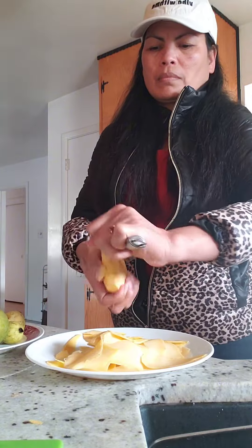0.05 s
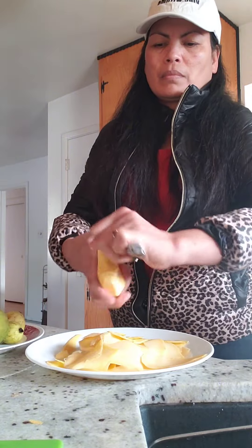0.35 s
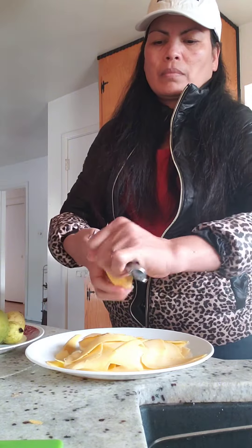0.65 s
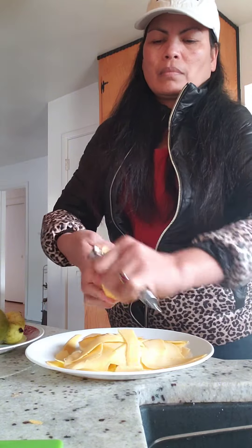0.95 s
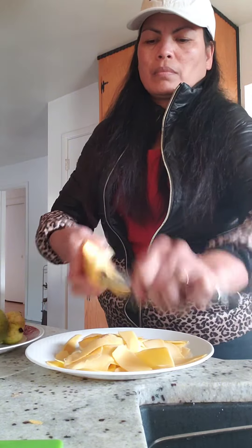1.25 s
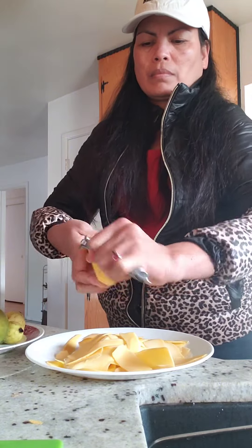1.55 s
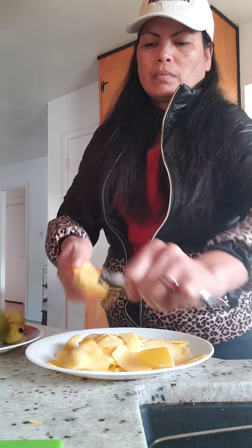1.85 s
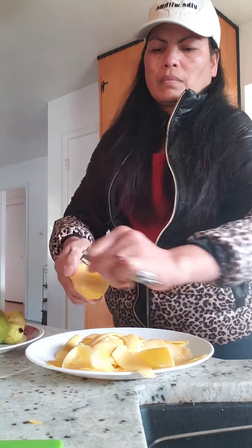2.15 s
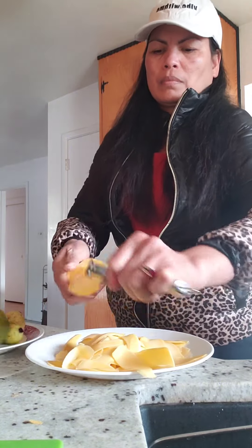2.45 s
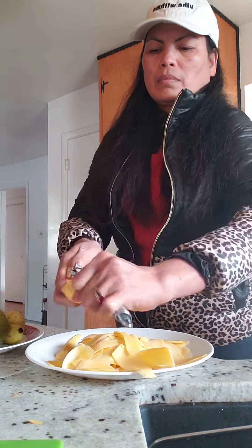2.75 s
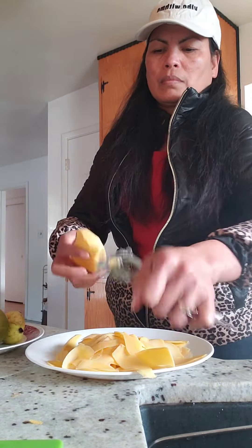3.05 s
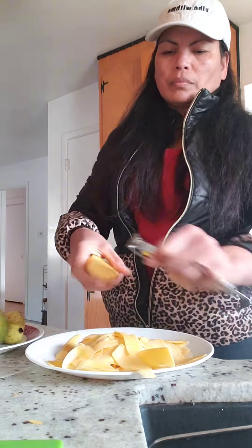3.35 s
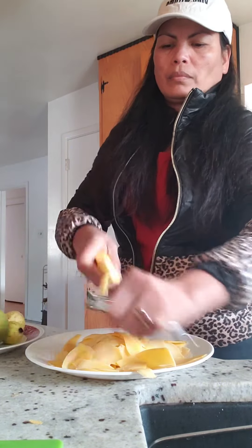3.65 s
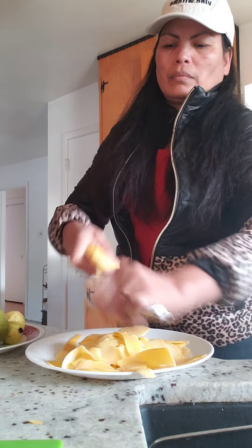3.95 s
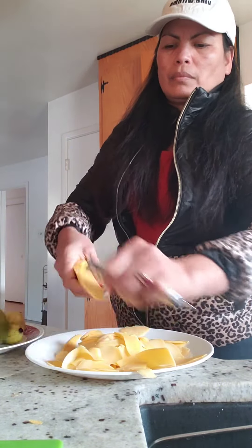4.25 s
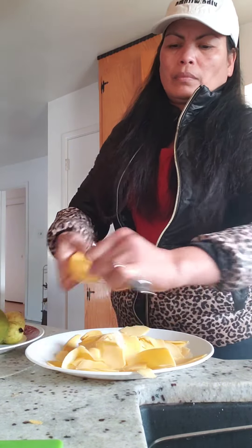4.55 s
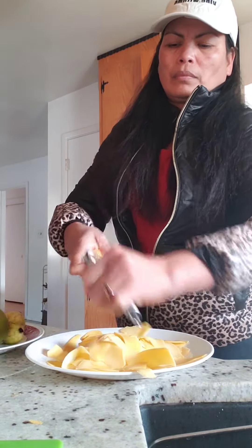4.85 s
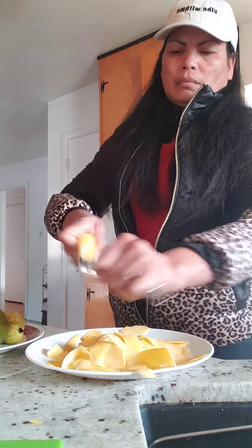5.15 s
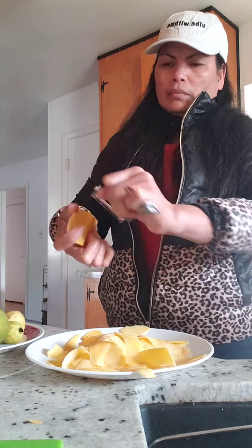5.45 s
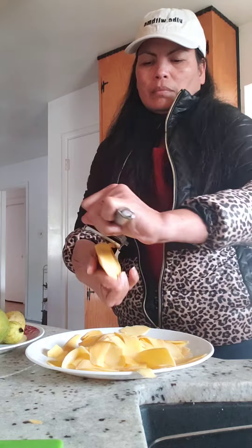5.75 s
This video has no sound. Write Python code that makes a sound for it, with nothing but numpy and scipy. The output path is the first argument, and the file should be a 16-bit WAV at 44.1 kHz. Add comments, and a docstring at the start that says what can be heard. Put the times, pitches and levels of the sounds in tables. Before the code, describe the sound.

A swivel peeler strips a ripe mango close to the microphone in a quiet kitchen with very little echo. From the start, short, bright scrapes come several times a second at an uneven pace. The blade skids on the skin, tears wetly through the flesh and clicks sharply against its stops, sometimes with a tiny metallic ping. A piece of peel pats down softly at about 0.9 seconds. The strokes carry on until about 2.8 seconds, then grow lighter and sparser, with a few clicks and a faint rustle of hands shifting grip. From 3.4 to 4.9 seconds comes a fast, steadier run, with one dull knock at 4.8 seconds. Another soft pat and some rustling follow just after 5 seconds, then scattered scrapes and clicks until about 5.8 seconds. A low room drone and a faint hiss continue underneath throughout.

```python
"""A swivel peeler strips a ripe mango over a stone counter in a quiet kitchen.
The blade skids on the skin in short, bright scrapes that set the peeler ringing, tears wetly through
the flesh and clicks against its pivot stops. Peel pats down; one stroke lands with a dull knock.
Below lie a low room drone, a faint hiss and the rustle of hands."""
import sys
import numpy as np
from scipy import signal
from scipy.fft import rfft, irfft
from scipy.io import wavfile

SR = 44100
rng = np.random.default_rng(int(sys.argv[2]) if len(sys.argv) > 2 else 0)


def store_pcm(level_fs):
    """Save levels as 16-bit WAV."""
    pcm = np.round(np.clip(level_fs, -1, 1) * 32767).astype(np.int16)
    wavfile.write(sys.argv[1], SR, np.atleast_2d(pcm).T)


N = 256220
TIME_S = np.arange(N) / SR
FREQS_HZ = np.maximum(np.arange(N // 2 + 1) * SR / N, 1)

# drone contour: (time [s], level before gain [dB])
DRONE_CONTOUR = [(0, -64), (2.9, -64.5), (3.15, -61.5), (3.5, -62), (4.65, -61), (4.78, -55.5), (5.02, -61),
                 (5.81, -55)]
# background noise: (frequency [Hz], relative density [dB])
DRONE_SPECTRUM = [(20, -30), (45, -16.5), (100, -5.5), (121, 3.5), (160, -7), (235, -21), (305, -13.5),
                  (450, -34.5), (1000, -40.5)]
HISS_SPECTRUM = [(300, 3), (1700, -1), (2600, 0), (3800, -3), (6400, 1.5), (8600, -15), (13000, 7),
                 (15700, 5)]
# peeling strokes: (start [s], length [s], catch skid [dB], leave skid [dB], slide [dB],
# tear [dB], deep bite [dB])
STROKES = [(0.04, 0.057, -28, -34.5, -39, -52.5, -61), (0.27, 0.025, -42, -16, -35, -44, -62),
           (0.43, 0.018, -35, -32, -38.0, -45, -62.5), (0.535, 0.016, -16.5, -33, -27.5, -53, -71),
           (0.604, 0.0098, -13.5, -20.5, -25.5, -47, -73), (0.659, 0.013, -23, -29, -30.5, -56.0, -54),
           (0.709, 0.039, -54, -15, -28.5, -40.5, -52.5), (0.852, 0.052, -56, -15.0, -31, -40, -53),
           (0.978, 0.015, -14.5, -41.5, -48.0, -37.5, -46.5), (0.998, 0.035, -54, -16.5, -36, -38.5, -62),
           (1.104, 0.051, -18, -16, -32.0, -36, -48.5), (1.227, 0.051, -12.5, -12, -27, -33.5, -43.0),
           (1.348, 0.015, -11, -22, -25.5, -31, -40.5), (1.607, 0.025, -33.5, -19, -34, -34.5, -71),
           (1.82, 0.044, -38, -17.5, -36.5, -34.5, -49.5), (1.943, 0.048, -22.5, -16, -27.5, -32, -43.5),
           (2.042, 0.036, -24, -41, -42, -36.5, -46.5), (2.099, 0.023, -33, -19.5, -28.5, -33, -46),
           (2.211, 0.032, -23, -15.5, -29.5, -35.5, -49.5), (2.373, 0.052, -22, -17.0, -33, -34, -51),
           (2.55, 0.036, -20.5, -18.5, -38, -36, -68.5), (2.65, 0.037, -13.5, -19.0, -30.5, -35.5, -55),
           (2.74, 0.028, -22, -41, -31, -33.5, -42.5), (2.991, 0.0059, -30.5, -38, -45, -33, -44.5),
           (3.094, 0.02, -25, -24.5, -36.5, -67, -73), (3.134, 0.017, -28, -29.5, -36.5, -64, -71),
           (3.443, 0.0071, -23, -19, -35, -47.0, -48), (3.471, 0.023, -43, -12, -27, -36, -44.5),
           (3.571, 0.029, -21, -11.5, -28.5, -37.5, -42), (3.663, 0.03, -15, -15.0, -32, -40, -44),
           (3.758, 0.034, -18, -16, -31, -39.5, -42.5), (3.858, 0.035, -15.5, -11.5, -31.5, -38.0, -39),
           (3.97, 0.027, -18.5, -12, -27, -35, -42.5), (4.223, 0.027, -35, -12, -28.5, -35.5, -49.5),
           (4.319, 0.042, -24, -14, -33.5, -34.5, -41), (4.433, 0.032, -18, -14.5, -32, -37.5, -58),
           (4.521, 0.031, -21.5, -11.5, -32, -42.5, -60.5), (4.605, 0.03, -17.5, -14.5, -30.0, -39.5, -52),
           (4.673, 0.028, -17, -16, -32, -40, -45.5), (4.736, 0.034, -21, -18.5, -26, -32.5, -40.5),
           (4.8, 0.033, -32, -28, -23, -30, -36), (4.878, 0.032, -15, -23, -29, -35, -43),
           (5.185, 0.012, -24.5, -19.5, -28.5, -45, -52), (5.282, 0.01, -21.5, -20, -29.5, -62, -62),
           (5.704, 0.034, -40, -19, -33, -34, -74)]
# blade glances off the skin: (peak time [s], level [dB])
FLICKS = [(0.338, -28), (0.396, -26.5), (0.833, -14), (1.56, -33), (1.785, -24.5), (2.165, -26),
          (2.783, -37), (3.028, -26), (3.184, -34.5), (3.522, -17.5), (3.923, -27.5), (3.947, -23.5),
          (4.092, -28.5), (4.156, -36), (4.187, -28), (4.947, -37.5), (5.055, -30), (5.532, -21),
          (5.578, -35.0), (5.639, -23.5)]
# blade hits its pivot stop: (time [s], level [dB])
PIVOT_CLICKS = [(0.293, -9.5), (0.398, -25), (0.4452, -17), (0.5303, -12.5), (0.668, -12.5), (0.7921, -14),
                (0.831, -29), (0.9881, -9.5), (1.035, -14.5), (1.16, -13), (1.3416, -12.5), (1.8617, -10.5),
                (1.986, -13.5), (2.053, -17), (2.0645, -9.5), (2.216, -20), (2.5554, -19), (2.5913, -19),
                (2.7605, -17), (3.0061, -16), (3.1156, -11), (3.1537, -16.0), (3.5763, -10), (3.6721, -10),
                (3.6943, -14.5), (3.7684, -12), (3.998, -25), (4.2434, -10), (4.2538, -15.5),
                (4.3322, -10.5), (4.6484, -20), (4.7168, -15), (4.806, -11), (4.841, -7), (4.9197, -23.5),
                (5.276, -26), (5.767, -25), (5.78, -22)]
# blade and frame resonances: (frequency [Hz], width [Hz], level over friction noise [dB])
PEELER_MODES = [(2416, 114, 7.5), (2580, 34, 6), (2930, 38, 4), (4160, 400, 6), (6167, 147, 7.5),
                (6756, 215, 4.5), (11070, 225, 7.5), (12790, 500, 3), (16280, 870, 10.5)]
# friction noise: (frequency [Hz], relative density [dB])
RASP_SPECTRUM = [(4500, -43), (7500, -11.5), (9200, -16), (10400, -11), (11800, -3.5), (12800, 0),
                 (14300, -1.5), (15700, -2.5)]
RING_SPECTRUM = [(1000, -18.5), (1800, -10), (2300, 0.5), (3400, -2.5), (4700, -0.5), (5400, 4.5),
                 (6700, 0), (7400, -12), (9500, -4.5)]
# deep tear, shallow shave, shaken fruit: (frequency [Hz], relative density [dB])
TEAR_SPECTRUM = [(450, -19), (800, -15.5), (970, 1.5), (1250, 2), (1800, 0.5), (2600, 0.5), (5000, -13)]
SHAVE_SPECTRUM = [(500, -18), (950, -15), (1300, 4.5), (1720, 7), (2100, 6), (2600, 6), (5000, -10.5)]
BITE_SPECTRUM = [(150, -3), (300, -3), (385, -10), (480, 2.5), (650, -0.5), (800, -7.5), (1300, -23)]
# peel lands: (time [s], pat [dB], thud [dB])
PEEL_PATS = [(0.94, -40, -41), (5.149, -42, -68)]
# blade chatter, pitch set by where it is held: (peak time [s], frequency [Hz], level [dB])
CHATTERS = [(0.17, 2720, -54), (0.298, 2664, -25), (0.534, 2526, -24.5), (.535, 6220, -24.5),
            (.605, 2655, -22), (.746, 2540, -29), (0.835, 2784, -29), (1.159, 2420, -26),
            (2.993, 1700, -36.5), (3.12, 2960, -26.5), (3.157, 2950, -29), (3.602, 2376, -22.5),
            (4.633, 2400, -25), (4.852, 6300, -27.5), (5.294, 2620, -28), (5.738, 1850, -28.5)]
# hands shift grip: (time [s], level [dB])
RUSTLES = [(.19, -51), (2.29, -56), (2.95, -59), (3.22, -51.5), (3.37, -54.5), (5.11, -48), (5.24, -50)]
# knock on the fruit: (time [s], level [dB])
KNOCKS = [(4.806, -27.5)]
# its modes: (frequency [Hz], gain [dB], t60 [s])
KNOCK_MODES = [(530, 10.5, 0.031), (1040, -3.5, 0.08)]
# left-right likeness of noise: (frequency [Hz], correlation [1])
STEREO_CORRELATION = [(100, 0.94), (450, 0.19), (1000, 0.24), (2000, 0.037)]
# channel colour: (frequency [Hz], left over right before normalising [dB])
STEREO_BALANCE = [(120, 12.5), (750, 4), (2500, 2), (3600, -0.5), (5400, 0), (6300, 7.5), (8200, 8),
                  (10800, 2), (12800, -7.5), (15800, 1.5)]


def from_db(db):
    return 10 ** (np.asarray(db) / 20)


def unit_rms(x):
    return x / np.sqrt(np.mean(x ** 2) + 1e-20)


def at_freqs(points):
    """Table interpolated over log frequency."""
    hz, value = np.transpose(points)
    return np.interp(np.log(FREQS_HZ), np.log(hz), value)


def drift(rate_hz):
    """Smooth random curve, unit RMS."""
    knots = rng.standard_normal(N // 8)
    return unit_rms(np.interp(TIME_S * rate_hz, np.arange(len(knots)), knots))


def response(spectrum, modes=()):
    """Unit-power causal filter: broad spectrum with resonances on top."""
    power = from_db(at_freqs(spectrum)) ** 2
    power /= 1 + (spectrum[0][0] / 2 / FREQS_HZ) ** 4   # low cut
    power *= 1 + sum(from_db(db) ** 2 / (1 + (2 * (FREQS_HZ - hz) / width_hz) ** 2)
                     for hz, width_hz, db in modes)
    cepstrum = irfft(np.log(power / power.mean()), N)
    cepstrum[0] /= 2
    cepstrum[N // 2:] = 0   # minimum phase: no pre-ringing
    return np.exp(rfft(cepstrum))


def filtered(x, gain):
    return irfft(rfft(x) * gain, N)


def resonate(x, hz, width_hz):
    """Two-pole resonance, unit peak gain."""
    radius = np.exp(-np.pi * width_hz / SR)
    feedforward = np.array([1, 0, -1]) * (1 - radius ** 2) / 2
    feedback = [1, -2 * radius * np.cos(2 * np.pi * hz / SR), radius ** 2]
    return signal.lfilter(feedforward, feedback, x + 1e-18)


def stereo_noise():
    """White noise: alike in the bass, unrelated in the treble."""
    mid, side = rfft(rng.standard_normal((2, N)))
    alike = np.clip(at_freqs(STEREO_CORRELATION), -1, 1)
    return unit_rms(irfft(np.sqrt(1 + alike) * mid + np.sqrt(1 - alike) * side * [[1], [-1]], N))


def pulse(peak_s, half_s):
    """Envelope with flanks linear in dB."""
    return 1 / np.cosh(np.clip((TIME_S - peak_s) / half_s, -20, 20))


def swell(peak_s, half_s):
    """Gaussian envelope."""
    return np.exp(-.5 * np.minimum(((TIME_S - peak_s) / half_s) ** 2, 20))


def decay(start_s, t60_s):
    """Envelope of a blow."""
    return (TIME_S >= start_s) * from_db(-60 * np.clip((TIME_S - start_s) / t60_s, 0, 2))


def room_drone(gain_db=3.5, waver_db=2.3):
    """Low noise, wavering in level."""
    level_db = gain_db + np.interp(TIME_S, *np.transpose(DRONE_CONTOUR)) + waver_db * drift(rate_hz=12)
    return from_db(level_db) * filtered(stereo_noise(), response(DRONE_SPECTRUM))


def hiss(rustle, floor_db=-57):
    """Thin steady noise, lifted by the rustle envelope."""
    return filtered(np.hypot(from_db(floor_db), rustle) * stereo_noise(), response(HISS_SPECTRUM))


def friction(attack_db_per_s=1500, release_db_per_s=779, skid_ring_db=-10, slide_rasp_db=-1.3):
    """Rasp and ring power. Stroke: skid on, slide under the skin, skid off. Flick: one skid."""
    slide_power = np.zeros(N)
    skids = list(FLICKS)
    for start_s, length_s, catch_db, leave_db, slide_db, _, _ in STROKES:
        near = slice(*np.searchsorted(TIME_S, [start_s - .1, start_s + length_s + .1]))
        age_s = TIME_S[near] - start_s
        fade_db = attack_db_per_s * np.maximum(-age_s, 0)
        fade_db += release_db_per_s * np.maximum(age_s - length_s, 0)
        tilt_db = 0.37 * (leave_db - catch_db)   # slide partly follows its two skids
        force_db = tilt_db * (np.clip(age_s / length_s, 0, 1) - .5)
        slide_power[near] += from_db(slide_db + force_db - fade_db) ** 2
        skids += [(start_s, catch_db), (start_s + length_s, leave_db)]
    skid_power = sum((from_db(db) * pulse(peak_s, half_s=0.0062)) ** 2 for peak_s, db in skids)
    rasp_power = skid_power + slide_power * from_db(slide_rasp_db) ** 2
    ring_power = slide_power + skid_power * from_db(skid_ring_db) ** 2
    return rasp_power, ring_power


def stick_slip(rate_hz, rough_db):
    """Force jumps as a contact catches and frees itself; unit RMS."""
    return unit_rms(from_db(rough_db * np.clip(drift(rate_hz), -2, 2)))


def fibre_crackle(snaps_per_s=150, burst_db=0.5, t60_s=0.0056):
    """Fibres snap at random, each a tiny burst on the friction; unit RMS."""
    snaps = (rng.random(N) < snaps_per_s / SR) * np.minimum(rng.exponential(1, N), 2.5)
    bursts = signal.lfilter([1], [1, -from_db(-60 / (t60_s * SR))], snaps + 1e-18)
    return unit_rms(np.hypot(1, from_db(burst_db) * bursts))


def peeler(clicks, click_ring_db=-10.5):
    """Friction and pivot clicks drive the same blade and frame."""
    rasp_power, ring_power = friction()
    grip = stick_slip(rate_hz=800, rough_db=1.47) * fibre_crackle()
    rasp = np.hypot(grip * np.sqrt(rasp_power), clicks)
    ring = np.hypot(grip * np.sqrt(ring_power), from_db(click_ring_db) * clicks)
    return (filtered(rasp * stereo_noise(), response(RASP_SPECTRUM, PEELER_MODES))
            + filtered(ring * stereo_noise(), response(RING_SPECTRUM, PEELER_MODES)))


def moving_contact(x, wander_db=3.0, rate_hz=30):
    """Contact slides along the blade, varying the drive of each mode."""
    return x + sum(resonate(x, hz, width_hz) * (from_db(wander_db * drift(rate_hz)) - 1)
                   for hz, width_hz, _ in PEELER_MODES)


def cut_timing(start_s, length_s):
    """Time of the deepest cut and half length of its tearing, both in s."""
    return start_s + 0.55 * length_s, 0.0074 + 0.21 * length_s


def loose_blade(x, hz=2680, width_hz=420, gain_db=-3, damping_knee_db=-38):
    """The blade rings when clear of the fruit; flesh damps it."""
    buried = 0
    for start_s, length_s, _, _, _, tear_db, _ in STROKES:
        peak_s, half_s = cut_timing(start_s, length_s)
        buried += from_db(tear_db - damping_knee_db) * pulse(peak_s, 2 * half_s)
    return x + from_db(gain_db) * resonate(x / (1 + buried ** 2), hz, width_hz)


def flesh(half_shave_db=-25.5, blend_db=5.5):
    """Fibres tear wetly, higher in a shallow cut; a deep bite shakes the fruit; peel pats down."""
    tear_power, shave_power, bite_power = np.zeros((3, N))
    cuts = [(swell(*cut_timing(start_s, length_s)), tear_db, bite_db)
            for start_s, length_s, _, _, _, tear_db, bite_db in STROKES]
    pats = [(swell(time_s, half_s=0.0075), pat_db, thud_db) for time_s, pat_db, thud_db in PEEL_PATS]
    for envelope, tear_db, bite_db in cuts + pats:
        deep_share = .5 + .5 * np.tanh((bite_db - tear_db - half_shave_db) / blend_db)
        power = (from_db(tear_db) * envelope) ** 2
        tear_power += deep_share * power
        shave_power += (1 - deep_share) * power
        bite_power += (from_db(bite_db) * envelope) ** 2
    fibres = stick_slip(rate_hz=700, rough_db=4.0)
    layers = (tear_power, TEAR_SPECTRUM), (shave_power, SHAVE_SPECTRUM), (bite_power, BITE_SPECTRUM)
    return sum(filtered(np.sqrt(power) * fibres * stereo_noise(), response(spectrum))
               for power, spectrum in layers)


def counter_echo(x, gain=0.48, delay_s=.0028, sway=.2, rate_hz=7):
    """Reflection off the stone; its delay sways with the hands, colouring each stroke."""
    echo = [np.interp(TIME_S - delay_s * (1 + sway * drift(rate_hz)), TIME_S, channel) for channel in x]
    return (x + gain * np.array(echo)) / np.sqrt(1 + gain ** 2 / 2)


def kitchen_reverb(x, level_db=-22.5, t60_s=0.083):
    """Faint diffuse tail from walls and cupboards."""
    tail = (rng.standard_normal((2, N)) * decay(0.011, t60_s))[:, :SR // 2]
    tail /= np.sqrt(np.sum(tail ** 2, axis=1, keepdims=True))
    return from_db(level_db) * signal.fftconvolve(x, tail, axes=1)[:, :N]


def blade_chatter(waver_rad=1.26, rate_hz=220, half_s=0.0088):
    """Brief pings on one blade mode, wavering under the changing contact."""
    phase_rad = waver_rad * np.array([drift(rate_hz), drift(rate_hz)])
    phase_rad += rng.uniform(0, 2 * np.pi, (2, 1))
    return sum(from_db(db) * swell(peak_s, half_s) * np.sin(2 * np.pi * hz * (TIME_S - peak_s) + phase_rad)
               for peak_s, hz, db in CHATTERS)


def hand_rustle():
    """Soft, uneven envelope of hands shifting grip."""
    shifts = sum(from_db(db) * pulse(time_s, half_s=0.038) for time_s, db in RUSTLES)
    return stick_slip(rate_hz=90, rough_db=4.0) * shifts


def pivot_click(time_s, drag_db=-9, crack_db=3, body_db=-1):
    """Envelope: the blade drags, cracks against its stop and dies away."""
    drag = from_db(drag_db) * (TIME_S < time_s) * pulse(time_s, half_s=0.0029)
    crack = from_db(crack_db) * decay(time_s, t60_s=0.0043)
    body = from_db(body_db) * decay(time_s, t60_s=0.037)
    return drag + crack + body


def knock(contact_s=0.0048):
    """A soft contact rings damped low modes."""
    out = np.zeros(N)
    for time_s, db in KNOCKS:
        age_s = TIME_S - time_s
        press = np.clip(age_s / contact_s, 0, 1)
        for hz, mode_db, t60_s in KNOCK_MODES:
            out += from_db(db + mode_db) * press * decay(time_s, t60_s) * np.sin(2 * np.pi * hz * age_s)
    return out


def scene():
    """Close peeling over the counter, in the room."""
    clicks = sum(from_db(db) * pivot_click(time_s) for time_s, db in PIVOT_CLICKS)
    blade = loose_blade(moving_contact(peeler(clicks)))
    peeling = counter_echo(blade + flesh()) + blade_chatter() + knock()
    return peeling + kitchen_reverb(peeling) + room_drone() + hiss(hand_rustle())


def record(dry, cutoff_hz=15850, edge_hz=200, ceiling=.95):
    """Colour each channel; cut the top steeply before and after clipping rare peaks."""
    balance = from_db(at_freqs(STEREO_BALANCE) * [[.5], [-.5]])
    balance /= np.sqrt(np.mean(balance ** 2, axis=0))
    low_pass = np.clip((cutoff_hz - FREQS_HZ) / edge_hz + .5, 0, 1)
    clipped = np.clip(filtered(dry, balance * low_pass), -ceiling, ceiling)
    return filtered(clipped, low_pass)


dry = scene()
out = record(dry)
store_pcm(out)
```